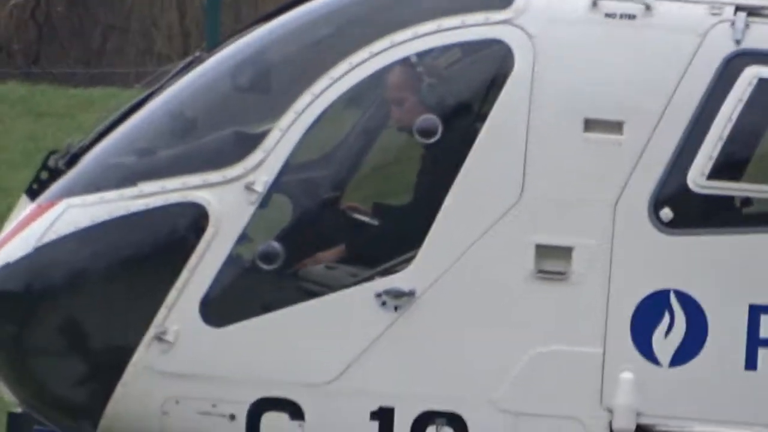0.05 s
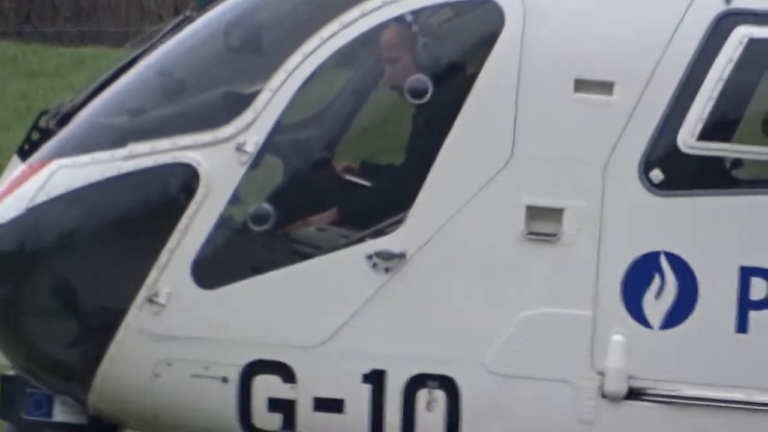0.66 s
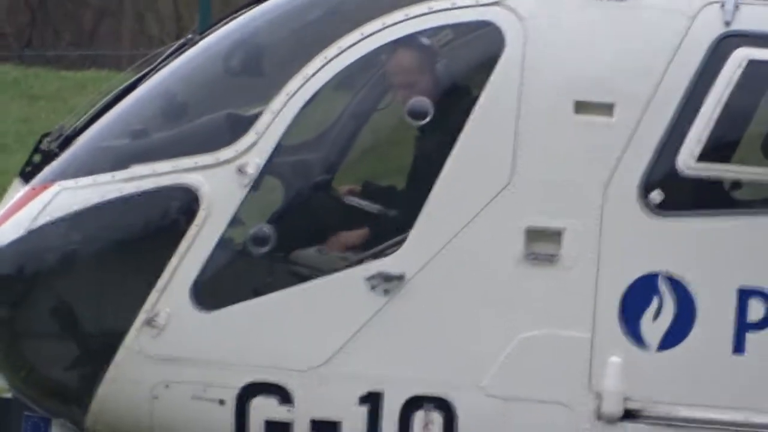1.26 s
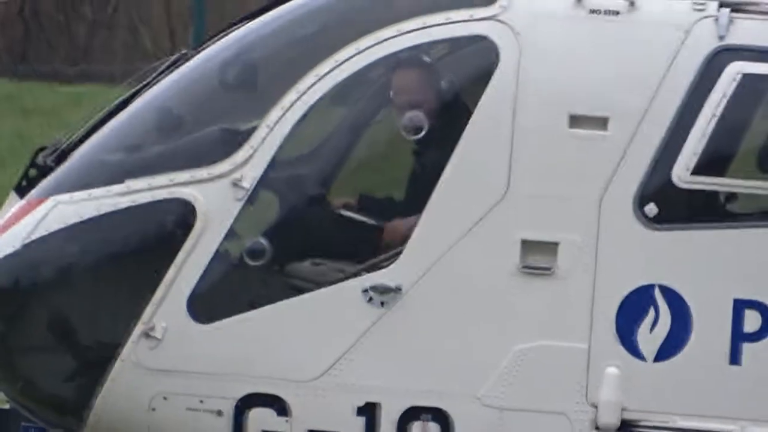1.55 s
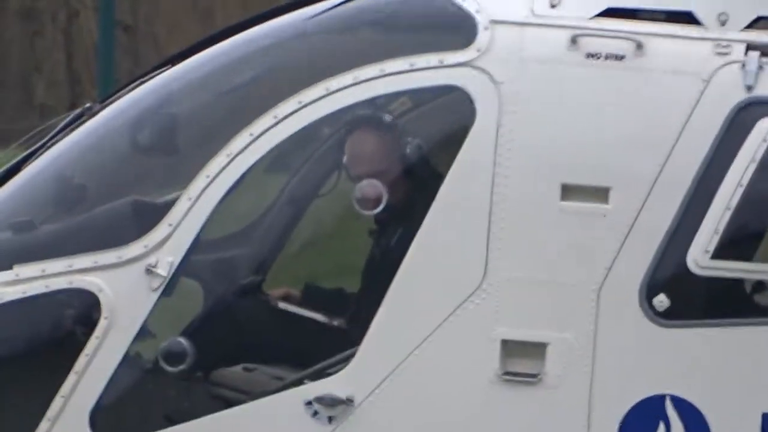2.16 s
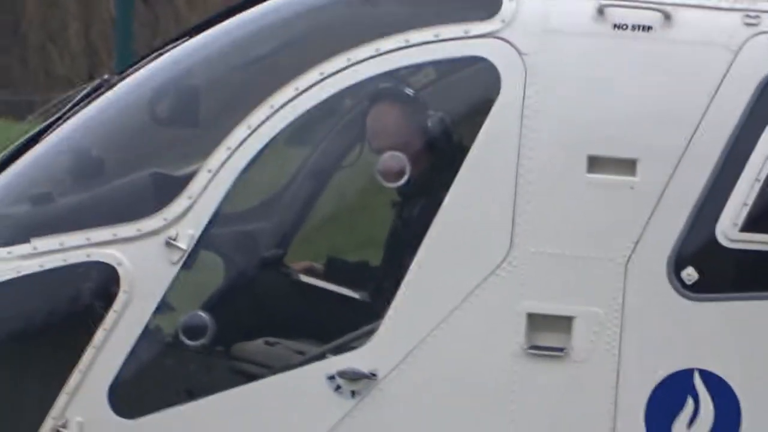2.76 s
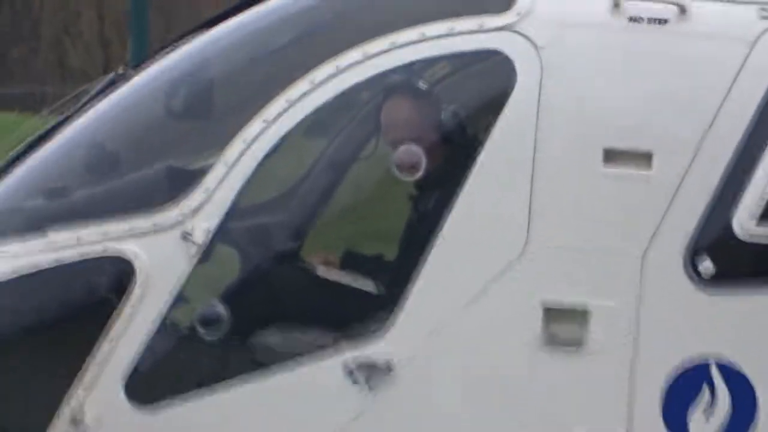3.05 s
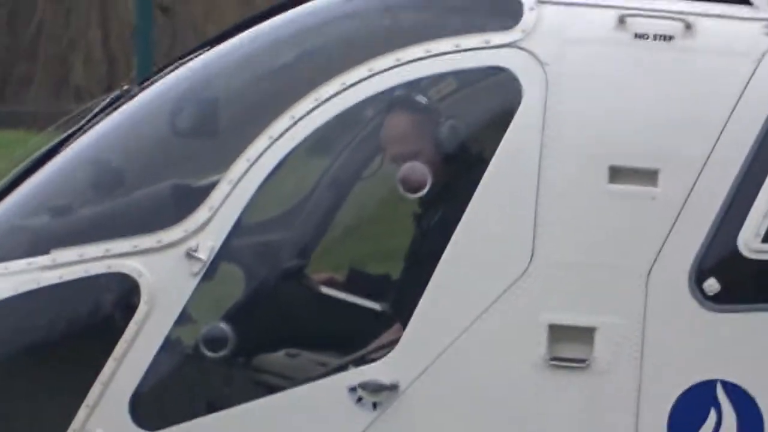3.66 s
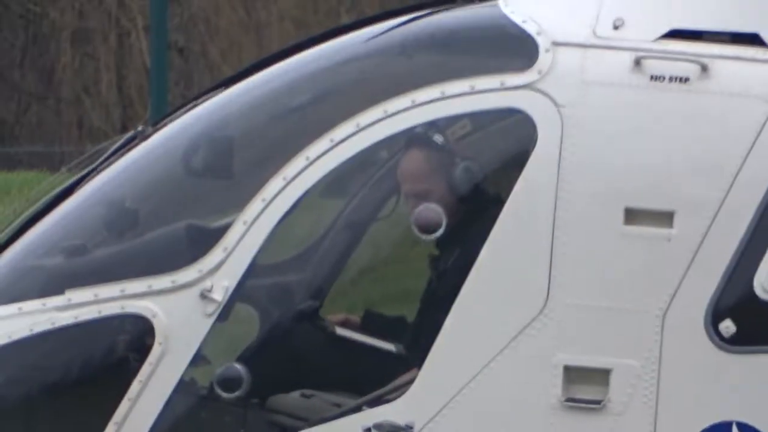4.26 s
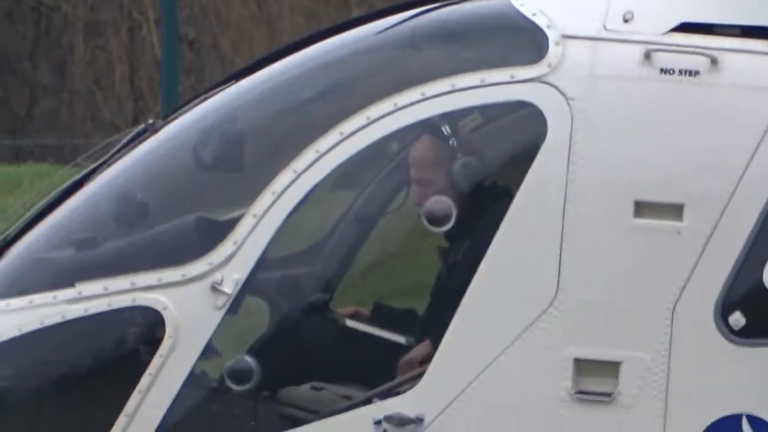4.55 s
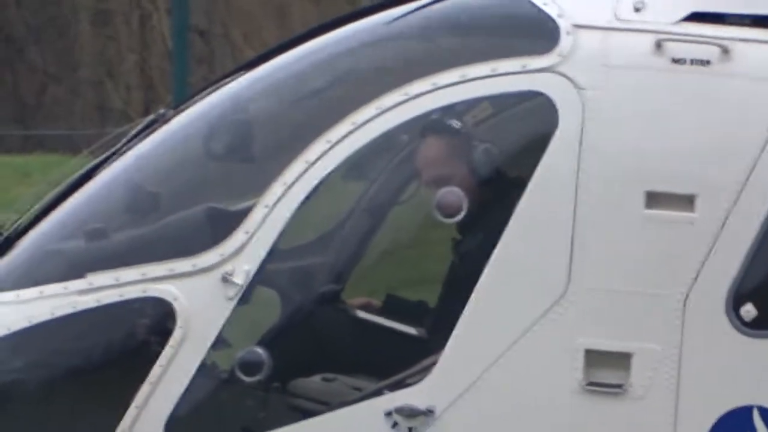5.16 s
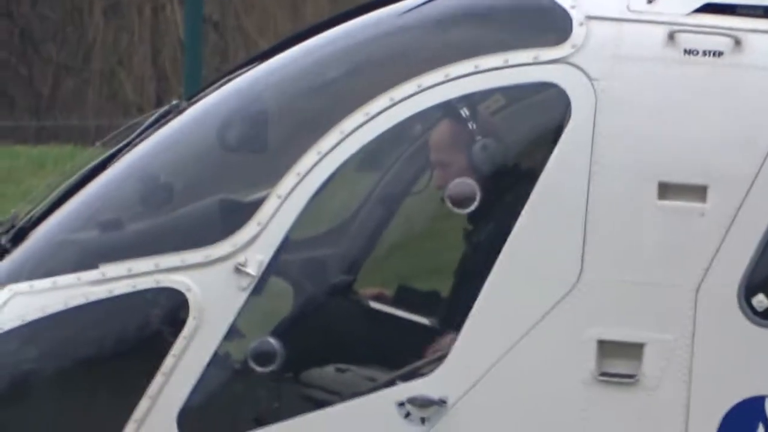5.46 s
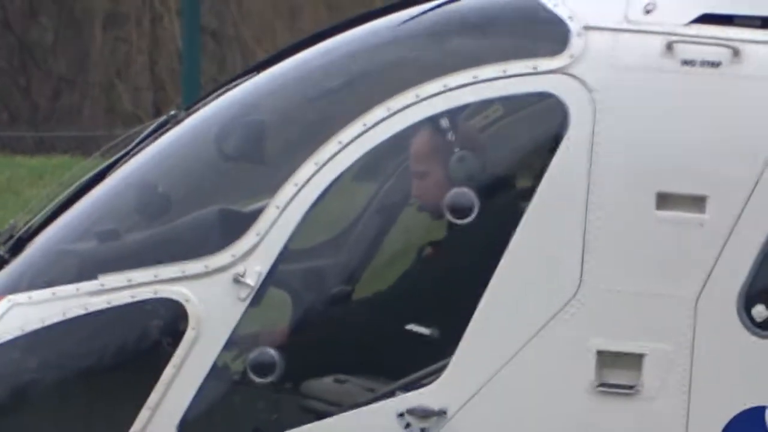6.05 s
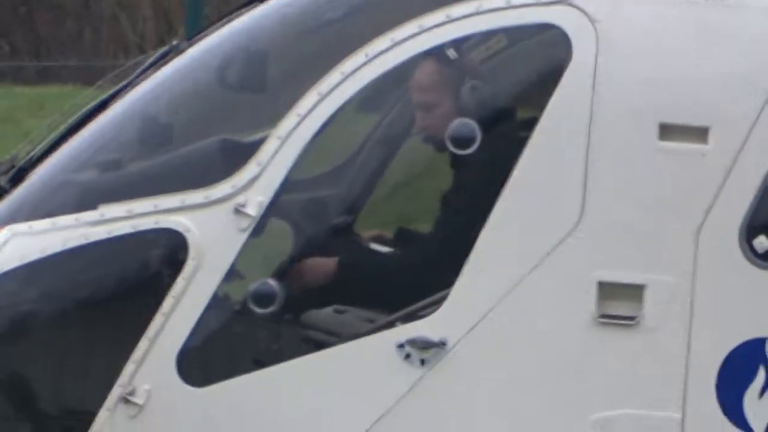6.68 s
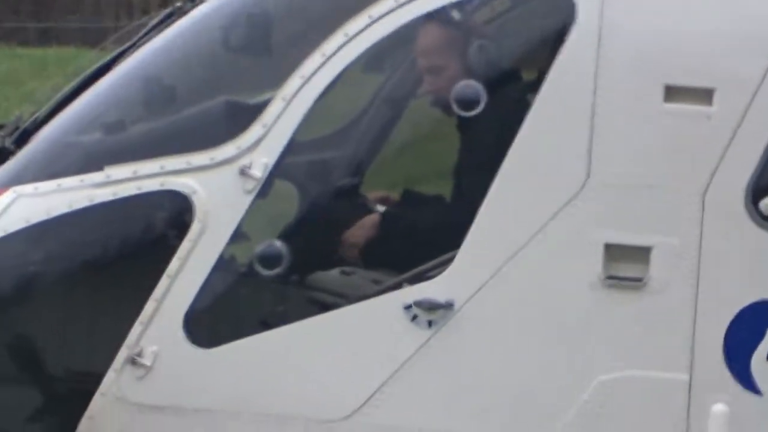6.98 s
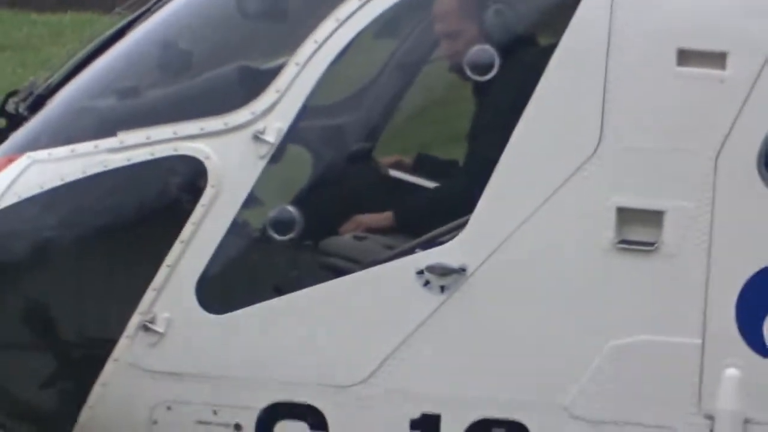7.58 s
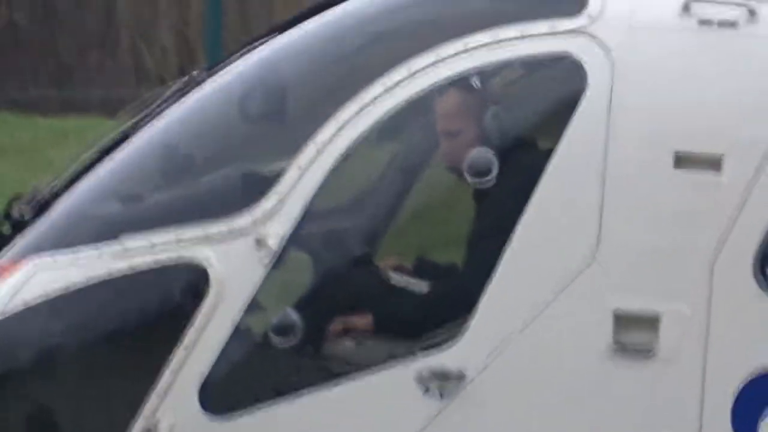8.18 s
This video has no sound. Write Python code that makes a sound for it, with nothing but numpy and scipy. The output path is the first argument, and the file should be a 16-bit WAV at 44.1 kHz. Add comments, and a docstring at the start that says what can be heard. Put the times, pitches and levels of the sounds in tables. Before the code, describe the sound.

Close, rapid rotor chop with bursts of sharp blade slap, above the steady rush and thin whine of idling helicopter turbines.

```python
"""On the grass, close to an idling twin-turbine helicopter, its five-blade rotor turning.
Every passing blade thumps and swishes; in gusts it cuts the wake of the one before and slaps.
Beneath run the exhaust roar, the fan and gear tones and the compressors' high whistle, all
swelling and fading with the wind. The downwash rumbles on the microphones, the exhaust hoots
at its pipe resonances, and a few faint ticks sit at the very top."""
import sys
import numpy as np
from scipy import signal
from scipy.fft import rfft, irfft, next_fast_len
from scipy.io import wavfile
from scipy.ndimage import uniform_filter1d, map_coordinates

SR = 44100
rng = np.random.default_rng(int(sys.argv[2]) if len(sys.argv) > 2 else 0)


def wav_out(sig):
    """Save sig, one row per channel (or a flat mono array), as 16-bit PCM at SR to the path in sys.argv[1]."""
    wavfile.write(sys.argv[1], SR, np.round(np.clip(np.atleast_2d(sig).T, -1, 1) * 32767).astype(np.int16))


N = 371322
TIME = np.arange(N) / SR
BLADE_PASS_HZ = 32.65


def amp(db):
    """Decibels to gain."""
    return 10 ** (np.asarray(db) / 20)


def unit(x):
    """Scale to rms 1."""
    return x / np.sqrt(np.mean(x ** 2) + 1e-20)


def along(points, at):
    """Read a curve on a log frequency axis."""
    frequency, value = np.transpose(points)
    return np.interp(np.log(at + 1e-6), np.log(frequency), value)


def curves(rows):
    """One automation curve for each column after the time."""
    times, *columns = np.transpose(rows)
    return [np.interp(TIME, times, column) for column in columns]


def wobble(rate):
    """A smooth random curve, rate knots a second."""
    knots = rng.standard_normal(8192)
    return map_coordinates(knots, [TIME * rate], mode="wrap")


def bell(x, centre, half_width):
    """A smooth rise and fall about a centre."""
    return np.exp(-((x - centre) / half_width) ** 2)


def swells(rows):
    """One bell envelope for each row that starts with (time [s], half length [s])."""
    return np.array([bell(TIME, s, half_length) for s, half_length, *_ in rows])


def filtered(x, response):
    """EQ x with a response given as a function of frequency."""
    size = next_fast_len(N + 8192)
    return irfft(rfft(x, size) * response(np.fft.rfftfreq(size, 1 / SR)), size)[..., :N]


def fading(hz, rate, steady=0):
    """A tone of rms 1 arriving by shifting paths that add and cancel; steady is the direct path."""
    paths = steady + wobble(rate) + 1j * wobble(rate)
    angle = 2 * np.pi * np.cumsum(hz * np.ones(N)) / SR
    return unit((paths * np.exp(1j * angle)).real)


# Stereo width of the diffuse sound: (frequency [Hz], side against mid [dB])
STEREO_WIDTH = [(20, -18), (40, -14), (80, -10), (160, -11), (210, -13.5), (290, -5), (400, -8.5),
                (560, -22), (1500, -22), (3300, -17.5), (4500, -24), (5600, -45), (8400, -45), (9700, -9.5),
                (12000, -19)]
def rush(colour, centre=1, patchy_db=1):
    """Stereo air noise of rms 1; centre slides its colour, eddies lift and dip it in patches."""
    hz, t, spectra = signal.stft(rng.standard_normal((2, N)), SR, nperseg=2048)
    centre = np.interp(t, TIME, centre * np.ones(N))
    eddies = uniform_filter1d(rng.standard_normal(spectra.shape[1:]), size=14, axis=0)
    eddies = unit(uniform_filter1d(eddies, size=9, axis=1))
    spectra *= amp(along(colour, hz[:, None] / centre) + patchy_db * eddies)
    spectra[1] *= amp(along(STEREO_WIDTH, hz))[:, None]
    mid, side = signal.istft(spectra, nperseg=2048)[1][:, :N]
    return unit(np.array([mid + side, mid - side]))


# Pressure pulse of a blade: (harmonic [x pass rate], base level [dB])
THUMP_HARMONICS = [(1, -58.5), (2, -52.5), (3, -53.5), (4, -49.5), (5, -51.5), (6, -55)]
# Level ride on the fourth harmonic and up: (time [s], gain [dB])
UPPER_RIDE = [(0, -3), (.65, 5), (1.1, -2), (1.7, -1), (2.35, 5), (2.9, 0.5), (3.4, 3), (3.8, -2),
              (4.15, 1.5), (4.6, -5), (5.4, 2.5), (6, -3.5), (6.6, -1), (7.2, -5.5), (7.9, 2), (8.42, -4)]
def blade_thump(waver_db=0.36, waver_radians=0.14):
    """The pressure field of the blades: low harmonics, the higher ones less steady."""
    angle = 2 * np.pi * BLADE_PASS_HZ * TIME
    ride_db, = curves(UPPER_RIDE)
    out = np.zeros(N)
    for harmonic, db in THUMP_HARMONICS:
        level_db = db + (harmonic >= 4) * ride_db + (harmonic + 0.5) * waver_db * wobble(3.93)
        phase = harmonic * (angle + waver_radians * wobble(5.5)) + rng.uniform(0, 2 * np.pi)
        out += np.sqrt(2) * amp(level_db) * np.sin(phase)
    return out


# Gusts push rough air into the rotor; a blade meets a leading patch, then the main one:
# (time [s], half length [s], swish level [dB], centre [Hz], edge against body [dB],
#  delay [blade passes], leading patch against main [ratio])
GUSTS = [(0.095, 0.11, -22.5, 1530, -24, 0.17, 0.11), (0.29, 0.12, -28, 1780, -7, 0.14, 0.13),
         (0.476, 0.24, -31, 1620, -5.5, 0.14, .15), (0.895, 0.12, -28, 2100, -11, 0.2, 0.75),
         (1.333, 0.22, -31, 1790, -7.5, 0.18, 0.13), (1.778, 0.2, -33, 1480, -10, 0.26, 0.31),
         (2.13, 0.12, -28.5, 1870, -8, 0.19, 0.14), (2.352, 0.23, -24.5, 1420, -13, 0.18, 0.12),
         (2.685, 0.12, -28.5, 1650, -7, 0.14, .1), (2.926, 0.16, -24, 1520, -14, 0.15, 0.35),
         (3.328, 0.18, -31.5, 1350, -14, 0.21, 0.6), (3.707, 0.18, -28, 1750, -10.5, 0.3, 0.85),
         (4.227, 0.085, -36, 1700, -1.5, 0.22, .3), (4.774, 0.12, -33, 2030, -4.5, 0.32, 0.68),
         (5.235, 0.19, -32, 2400, -4.5, 0.23, 0.24), (5.583, 0.14, -28.5, 1870, -11, 0.26, 0.9),
         (5.818, 0.12, -27, 1680, -10.5, 0.1, 0.5), (6.343, 0.1, -29.5, 1590, -14, 0.29, 1),
         (7.067, 0.1, -42, 2400, 10, 0.24, 0.33), (7.19, .07, -32, 2070, -6, 0.25, 0.4),
         (7.28, 0.064, -36.5, 2200, 2, .2, 0.51), (7.39, 0.097, -28.5, 2080, -5.5, 0.23, 0.38),
         (7.52, 0.086, -32.5, 2100, -2, 0.29, 0.5), (7.664, 0.15, -28.5, 2150, -7.5, 0.3, 0.75),
         (7.966, 0.13, -26, 1850, -8.5, 0.26, 1), (8.151, 0.13, -29.5, 1890, -8, 0.36, 0.56)]
def rough_air(calm_db=-38, calm_hz=2000, calm_edge_db=-7.5, calm_delay_passes=0.3, calm_lead=1.2):
    """Swish controls and a running count of blade passes: gusts and calm blend by their power."""
    gusts = np.array(GUSTS)
    power = np.vstack([swells(GUSTS) * amp(gusts[:, 2:3]) ** 2, np.full(N, amp(calm_db) ** 2)])
    total = power.sum(axis=0)
    settings = np.vstack([gusts[:, 3:], (calm_hz, calm_edge_db, calm_delay_passes, calm_lead)])
    centre_hz, edge_db, delay, lead = settings.T @ power / total
    passes = BLADE_PASS_HZ * TIME - delay
    return 10 * np.log10(total), centre_hz, edge_db, lead, passes


def lobe(passes, width, skew=0.03):
    """One smooth swell for every blade pass, falling faster than it rises; width in passes."""
    angle = 2 * np.pi * passes
    skewed_width = 2 * np.pi * width * (1 - skew * np.sin(angle))
    return np.exp((np.cos(angle) - 1) / skewed_width ** 2)


# Body of the swish: (frequency [x centre], relative level [dB])
SWISH_BODY = [(.18, -45), (.36, -7.5), (.55, -3), (.8, 4), (1.1, 3.5), (1.7, -7), (2.6, -16.5), (5, -48)]
# Its bright edge: (frequency [Hz], relative level [dB])
SWISH_EDGE = [(900, -38), (2000, -1.5), (3100, 6.5), (4000, 2.5), (5200, -2.5), (7500, -2), (10000, -9),
              (15000, -34)]
def blade_swish(passes, level_db, centre_hz, edge_db, lead, lead_passes=0.3, scatter_db=0.5, grain_db=2):
    """Each blade tears a burst of noise from the air, brightest at its crest."""
    jittered = passes + 0.012 * wobble(33)
    strength = amp(level_db + scatter_db * wobble(33))
    grain = unit(amp(grain_db * wobble(900)))

    def gate(width):
        """The main burst and the leading one share the power."""
        main, leading = lobe(jittered, width), lead * lobe(jittered + lead_passes, width)
        return unit(np.sqrt((main ** 2 + leading ** 2) / (1 + lead ** 2)))
    body = gate(width=0.14) * rush(SWISH_BODY, centre_hz, patchy_db=1.8)
    edge = amp(edge_db) * gate(width=0.1) * rush(SWISH_EDGE, patchy_db=2.6)
    return strength * grain * (body + edge)


# Engine bed on the wind: (time [s], exhaust base level [dB], fan rush base level [dB])
ENGINE_RIDE = [(0.0, -25.5, -29.5), (0.4, -29.5, -28), (0.9, -27.5, -29.5), (1.1, -29, -28.5),
               (1.45, -30.5, -32), (1.85, -31, -29), (2.05, -33.5, -27.5), (2.35, -32.5, -28),
               (2.65, -33, -28.5), (3.35, -34, -30), (3.9, -36.5, -32.5), (4.1, -36.5, -30.5),
               (4.41, -36.5, -33.5), (4.78, -38, -32), (5.05, -37.5, -35), (5.53, -34.5, -33.5),
               (5.8, -33, -31), (6.3, -33, -31), (7.06, -39, -35), (7.25, -39, -39.5), (7.6, -39, -37),
               (7.85, -33.5, -31), (8.04, -33.5, -31.5), (8.42, -36, -31.5)]
# Intake hiss on the wind: (time [s], base level [dB])
INTAKE_RIDE = [(0.0, -37.5), (0.47, -37.5), (1.83, -41), (2.01, -42.5), (2.25, -40.5), (3.0, -42.5),
               (3.68, -39.5), (3.85, -41.5), (4.9, -42), (5.84, -40), (6.33, -39.5), (6.66, -44),
               (7.13, -47.5), (7.39, -45.5), (8.25, -38), (8.42, -38.5)]
# Colours of the exhaust roar, fan rush and intake hiss: (frequency [Hz], relative level [dB])
EXHAUST_COLOUR = [(200, -36), (370, -22), (480, -6.5), (570, -2.5), (620, 4), (730, 3), (870, -3.5),
                  (1100, -4), (1600, -26), (3000, -56)]
FAN_COLOUR = [(500, -28.5), (900, -4), (1200, 3.5), (1600, 0), (2300, -1.5), (3000, -8.5), (4200, -12),
              (6000, -23.5), (10000, -63)]
INTAKE_COLOUR = [(2000, -4.5), (4000, -7.5), (5500, 1), (6800, 1.5), (7600, 4.5), (8600, 2.5), (9800, -5),
                 (11100, -5.5), (11800, -9.5), (13500, -16.5), (15000, -33), (15700, -32)]
def engine_roar(passes, fan_trim_db=0.2, hiss_trim_db=1.63, flutter_db=0.14, hiss_flutter_db=1.0):
    """Exhaust, fan and intake noise, fluttering in the downwash and lightly chopped by the blades."""
    exhaust_db, fan_db, hiss_db = curves(ENGINE_RIDE) + curves(INTAKE_RIDE)
    chop = 1 + 0.082 * np.cos(2 * np.pi * passes)
    exhaust = amp(exhaust_db + flutter_db * wobble(45)) * rush(EXHAUST_COLOUR, patchy_db=0.64)
    fan = amp(fan_db + fan_trim_db + flutter_db * wobble(55)) * rush(FAN_COLOUR, patchy_db=0.3)
    hiss_gain = amp(hiss_db + hiss_trim_db + hiss_flutter_db * wobble(45))
    return chop * (exhaust + fan + hiss_gain * rush(INTAKE_COLOUR, patchy_db=2.2))


# EQ rides on a hollow band and a woody band of the rushing air: (time [s], gain [dB])
HOLLOW_RIDE = [(0, 0.5), (.4, 0.5), (2, 1), (2.35, 0), (2.7, -1.5), (3.5, 3), (4.6, 0), (5, -5.5),
               (5.2, 2.5), (5.8, 2.5), (6.2, 0.5), (6.8, 0), (7.12, -2), (7.5, -0.5), (8.42, -4.5)]
WOODY_RIDE = [(0, 0.5), (.9, 3), (1.5, 1.5), (1.8, 4), (2.1, -10), (2.45, -0.5), (2.95, -4), (3.3, -1),
              (4.5, 3), (5, -3), (5.25, 2.5), (5.45, -0.5), (6.9, -1.5), (7.2, 3.5), (7.45, -1), (7.7, 1),
              (8, 0.5), (8.42, -0.5)]
def slow_phasing(air):
    """Two midrange bands of the rushing air swell and sink."""
    for ride, centre_hz, width_hz in ((HOLLOW_RIDE, 890, 230), (WOODY_RIDE, 2040, 270)):
        band = filtered(air, lambda hz: bell(hz, centre_hz, width_hz))
        air = air + (amp(curves(ride)[0]) - 1) * band
    return air


# Downwash hitting the microphones: (time [s], half length [s], level [dB])
BUFFETS = [(0.1, 0.32, -48), (1.22, 0.28, -42), (7.987, 0.075, -35.5)]
# Colours of the rumble and the buffets: (frequency [Hz], relative level [dB])
RUMBLE_COLOUR = [(8, -30), (25, -18), (50, -26), (85, -3), (125, -2), (200, -0.5), (250, -7), (310, -12.5),
                 (420, -11.5), (900, -36)]
BUFFET_COLOUR = [(10, -10), (30, 3), (70, 2), (200, -2), (450, -16), (900, -45)]
def downwash(rumble_db=-43, follow=0.086):
    """A low rumble that the wind carries with the exhaust, and a few buffets."""
    exhaust_db = curves(ENGINE_RIDE)[0]
    lift_db = follow * (exhaust_db - exhaust_db.mean())
    rumble = amp(rumble_db + lift_db) * rush(RUMBLE_COLOUR, patchy_db=0.5)
    buffeting = amp(np.array(BUFFETS)[:, 2]) @ swells(BUFFETS)
    return rumble + buffeting * rush(BUFFET_COLOUR)


# Fan and gear tones swell and fade as the wind shifts: (time [s], level [dB])
FAN_TONE_RIDE = [(0, -35), (.85, -33), (1.07, -28.5), (1.22, -37.5), (1.4, -39), (1.85, -32.5), (1.98, -38),
                 (2.2, -38), (2.6, -35), (2.95, -34), (3.1, -42), (3.42, -33), (3.62, -48), (3.76, -34),
                 (3.9, -26.5), (4.1, -33.5), (4.28, -31.5), (4.45, -40), (4.85, -38), (5.35, -45),
                 (5.85, -37.5), (6.3, -42), (6.75, -42), (6.88, -39.5), (7.11, -35.5), (7.2, -45),
                 (7.8, -47), (8.05, -43), (8.42, -39)]
GEAR_TONE_RIDE = [(0, -38), (.7, -38.5), (1.1, -32), (1.4, -39), (1.95, -40), (2.1, -36), (3, -36.5),
                  (3.4, -38), (4.2, -40), (5.3, -54), (5.75, -35), (6.05, -45), (6.35, -32.5), (6.55, -40),
                  (6.62, -35.5), (6.73, -37), (6.83, -46), (7.6, -46), (8, -50), (8.15, -46), (8.42, -35.5)]
def machinery(fan_hz=1173, gear_hz=1415, drone_hz=613, octave_db=-14.5, drone_db=-14, shaft_db=-18.5):
    """Fan and gear tones; the fan's octave, an exhaust drone and shaft whines ride the engine bed."""
    fan_db, gear_db = curves(FAN_TONE_RIDE) + curves(GEAR_TONE_RIDE)
    exhaust_db, fan_rush_db, hiss_db = curves(ENGINE_RIDE) + curves(INTAKE_RIDE)
    out = amp(fan_db) * fading(fan_hz, rate=30, steady=4.1)
    out += amp(gear_db) * fading(gear_hz, rate=36, steady=2.8)
    out += amp(fan_rush_db + octave_db) * fading(2 * fan_hz, rate=13, steady=1.2)
    out += amp(exhaust_db + drone_db) * fading(drone_hz, rate=28)
    for shaft_hz in (4598, 6014, 7505):
        out += amp(hiss_db + shaft_db) * fading(shaft_hz, rate=23)
    return out


# The whistle on the wind: (time [s], level [dB])
WHISTLE_RIDE = [(0, -36), (.45, -43.5), (.6, -35), (.75, -41.5), (1, -40.5), (1.3, -40.5), (1.7, -46),
                (2.37, -43), (2.49, -35.5), (2.65, -43), (3.17, -47), (3.33, -40), (3.5, -45), (3.7, -41),
                (4.02, -45), (4.15, -44.5), (4.55, -40.5), (4.75, -51), (4.95, -40), (5.1, -48.5),
                (5.65, -50), (5.82, -38), (6.05, -44), (6.5, -41), (6.65, -48), (7.1, -53), (7.5, -50),
                (8.3, -40)]
# Its slight sag: (time [s], pitch [Hz])
WHISTLE_PITCH = [(0, 11372), (.8, 11358), (4.3, 11366), (6.9, 11357), (8.1, 11335), (8.42, 11360)]
def compressor_whistle(wander_hz=9):
    """The compressors' whistle: a fluttering core and a scattered halo, different on each side."""
    level_db, hz = curves(WHISTLE_RIDE) + curves(WHISTLE_PITCH)
    hz += wander_hz * wobble(20)
    core = fading(hz, rate=40, steady=1.5) + 0.42 * fading(hz, rate=130)
    halo = np.array([fading(hz, rate=240) for _ in range(2)])
    return amp(level_db) * unit(core + 0.24 * halo)


# The hardest slaps: (time [s], level over 4 ms [dB], centre [Hz], rattle spread [s])
HARD_SLAPS = [(0.037, -20, 1500, .0025), (0.0661, -18, 1750, .0025), (.0985, -24.5, 1700, 0.0018),
              (0.1274, -18, 1850, .0022), (0.159, -18, 1300, .002), (0.19, -20, 1600, 0.0034),
              (.2484, -23, 2200, .0015), (0.2805, -19.5, 3270, .0011), (.3108, -20.5, 2820, .0013),
              (.341, -23, 2400, .0015), (0.3712, -22, 2590, 0.0022), (0.4636, -20.5, 2220, .0015),
              (.4937, -22, 1900, .002), (.925, -18, 1660, .0013), (1.23, -26, 1700, .002),
              (1.262, -25, 1800, .002), (1.322, -24, 2200, .0015), (1.354, -27, 3000, .0015),
              (1.384, -27, 3000, .0015), (1.8194, -20.5, 1700, .002), (2.087, -20, 2000, .001),
              (2.1168, -18, 2230, 0.0023), (2.1498, -22, 2110, 0.0017), (2.179, -18.5, 2150, .0025),
              (2.2402, -21, 2200, .0015), (2.272, -19, 2100, 0.0033), (2.303, -23, 2000, 0.0016),
              (2.3312, -23, 1700, .0012), (2.363, -26, 1600, 0.0018), (2.4256, -18, 1550, 0.0014),
              (2.639, -21, 2000, .0012), (2.668, -21, 1800, .0015), (2.701, -26, 2200, .003),
              (2.73, -19, 1840, .0013), (2.7606, -24, 1950, .0015), (2.7908, -20.5, 1690, 0.0011),
              (2.82, -25, 2100, .002), (2.8822, -17.5, 1600, 0.0022), (2.914, -24, 1800, .002),
              (5.2444, -20, 2650, .001), (5.276, -23, 2400, .001), (5.3072, -18, 2250, 0.0016),
              (5.336, -27, 2100, .001), (5.368, -27, 2300, .002), (5.8197, -20.5, 1900, .002),
              (5.885, -26, 1800, .002), (5.9188, -26, 2600, .0015), (7.176, -30, 2000, .002),
              (7.2045, -30, 2000, .002), (7.2345, -23, 2200, .004), (7.265, -33, 5200, .003),
              (7.296, -26, 4000, .002), (7.3275, -20, 2400, 0.0029), (7.3587, -20.5, 2450, .0025),
              (7.3884, -27, 2500, 0.0018), (7.419, -25, 2400, .002), (7.4504, -22, 2600, .002),
              (7.4818, -25, 2600, .002), (7.5138, -23, 2500, .002), (7.5425, -25, 2900, .002),
              (7.6046, -23, 2500, .0013), (7.9638, -16, 1750, 0.0016), (8.065, -27, 2500, .002),
              (8.1242, -19.5, 2760, .001)]
# Colour of a slap: (frequency [x centre], relative level [dB])
SLAP_COLOUR = [(.12, -42), (.3, -26), (.6, -0.5), (1, 5.5), (1.5, -1.5), (3, -20), (6, -58)]
def blade_slaps(passes, level_db, centre_hz, light_db=-7.5, scatter_db=1.4, light_spread_s=0.0018):
    """A blade cuts a tip vortex: a crack in a rattle of eddies, light on every pass, at times hard."""
    starts = np.flatnonzero(np.diff(np.floor(passes)) > 0)
    chance = rng.standard_normal((len(starts), 2))
    light_slaps = [(i / SR + 0.0008 * late, level_db[i] + light_db + scatter_db * size,
                    1.02 * centre_hz[i], light_spread_s) for i, (late, size) in zip(starts, chance)]
    half, level_window_s = 512, 0.004
    t = np.arange(-half, half) / SR
    bins_hz = np.fft.rfftfreq(len(t), 1 / SR)
    spike = 2 * (t == 0)
    out = np.zeros(N + 4 * half)
    for s, db, hz, spread_s in HARD_SLAPS + light_slaps:
        rattle = 0.58 * np.exp(-np.abs(t) / spread_s) * rng.standard_normal(len(t))
        colour = amp(along(SLAP_COLOUR, bins_hz / hz))
        crack = irfft(1j * rfft(spike + rattle) * colour)  # 1j turns the spike into a push and a pull
        crack *= amp(db) * np.sqrt(level_window_s * SR) / np.linalg.norm(crack)
        out[np.clip(round(s * SR), 0, N):][:len(t)] += crack
    return out[half:][:N]


def reflected(x, delay_s=0.00105, share=0.19, corner_hz=1800):
    """A close reflection combs the upper spectrum."""
    def comb(hz):
        """The direct sound plus a late, high-passed copy."""
        highpass = hz ** 2 / (hz ** 2 + corner_hz ** 2)
        return 1 + share * highpass * np.exp(-2j * np.pi * hz * delay_s)
    return filtered(x, comb)


# Hoots of the exhaust pipes: (time [s], half length [s], level [dB], pitch [Hz])
HOOTS = [(0.246, .05, -32.5, 628), (0.536, 0.03, -32.5, 672), (1.05, 0.063, -36, 706),
         (1.315, 0.089, -33, 617), (1.632, 0.04, -33, 710), (1.766, 0.082, -35, 615),
         (2.544, 0.065, -32, 616), (3.024, 0.053, -38, 617), (3.2, .05, -33, 712), (3.3, 0.065, -33, 616),
         (3.39, 0.03, -30.5, 710), (3.72, .06, -37.5, 612), (5.53, .05, -42, 614), (6.297, 0.14, -43, 618),
         (6.85, .07, -42, 612), (7.86, 0.052, -38, 680), (8.38, 0.089, -44, 612)]
def exhaust_hoots(wander_hz=9):
    """Short swells of the exhaust's pipe resonances, their pitch warbling with the gas flow."""
    warble = 2 * np.pi * np.cumsum(wander_hz * wobble(11)) / SR
    return sum(np.sqrt(2) * amp(db) * bell(TIME, s, half_length) * np.sin(2 * np.pi * hz * TIME + warble)
               for s, half_length, db, hz in HOOTS)


# Tick cues: (time [s], level [dB])
TICKS = [(.647, -48), (.679, -40), (1.317, -50), (1.35, -45), (1.381, -46), (2.959, -49), (2.992, -39),
         (3.045, -47), (3.992, -47), (4.025, -41), (4.079, -44)]
# Colour of a tick: (frequency [Hz], relative level [dB])
TICK_COLOUR = [(7000, -30), (11000, -2), (13000, 2), (15500, -4)]
def ticks(half_length_s=0.0024):
    """A few faint blips of noise at the top of the treble."""
    return sum(amp(db) * bell(TIME, s, half_length_s) for s, db in TICKS) * rush(TICK_COLOUR)


def scene():
    """Rotor and engines, almost straight ahead."""
    level_db, centre_hz, edge_db, lead, passes = rough_air()
    swish = blade_swish(passes, level_db, centre_hz, edge_db, lead)
    air = slow_phasing(swish + engine_roar(passes)) + downwash()
    tones = blade_thump() + machinery() + exhaust_hoots() + compressor_whistle()
    slaps = blade_slaps(passes, level_db, centre_hz)
    return reflected(air + slaps) + tones + ticks()


# Left microphone against right: (frequency [Hz], phase lead [rad], level [dB])
MIC_PAIR = [(40, .04, .2), (300, .16, 0), (1100, .12, -.6), (2600, .22, -.4), (4200, 0, 0)]
def record(dry):
    """Two close microphones, the left slightly ahead, with a hard high cut."""
    def response(hz, cutoff_hz=15500):
        """Phase and level offsets, half on each side."""
        pair, sides = np.array(MIC_PAIR), np.array([[0.5], [-0.5]])
        lead, level_db = (sides * along(pair[:, [0, k]], hz) for k in (1, 2))
        return (hz < cutoff_hz) * amp(level_db) * np.exp(1j * lead)
    return filtered(dry, response)


dry = scene()
out = record(dry)
wav_out(out)
```